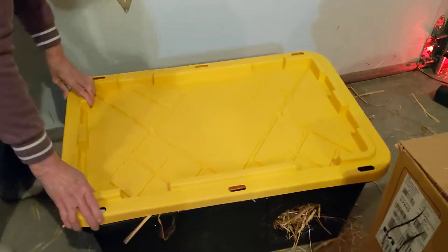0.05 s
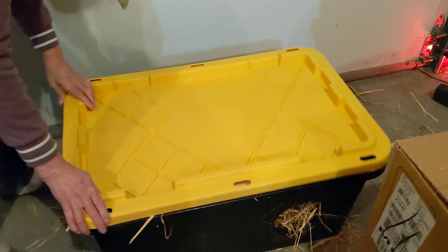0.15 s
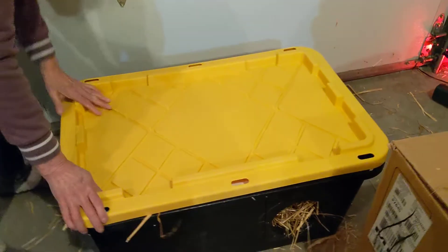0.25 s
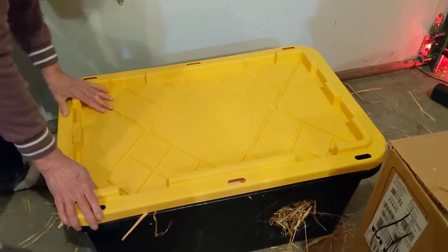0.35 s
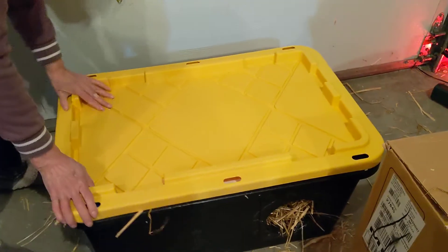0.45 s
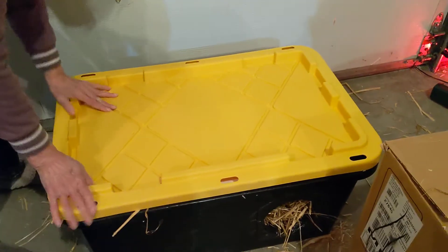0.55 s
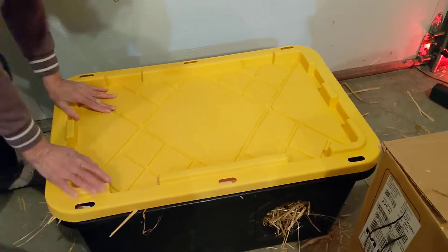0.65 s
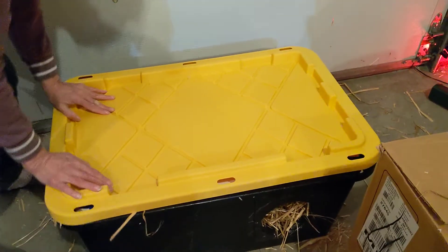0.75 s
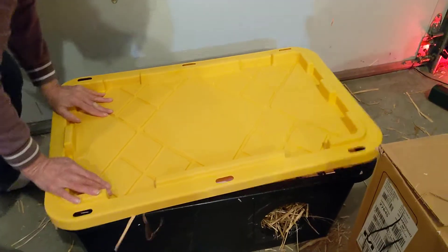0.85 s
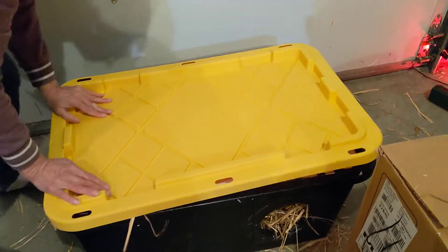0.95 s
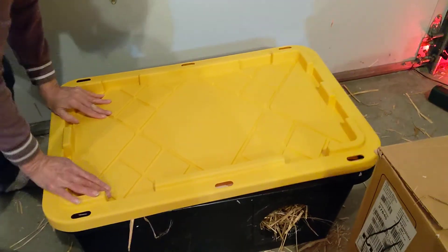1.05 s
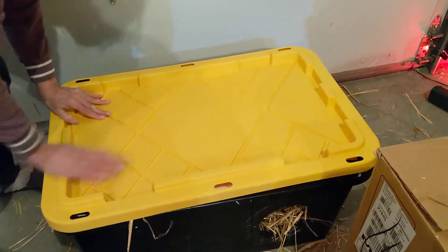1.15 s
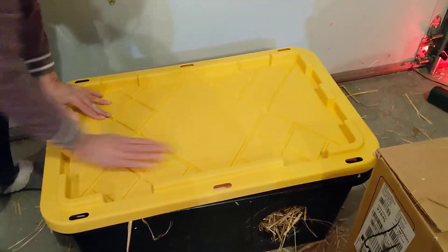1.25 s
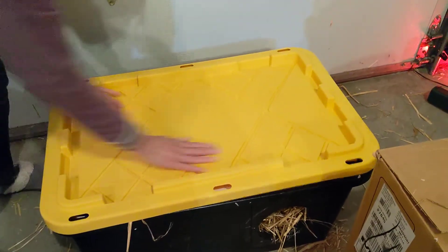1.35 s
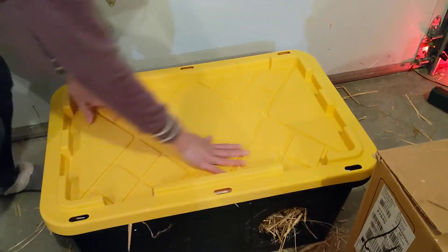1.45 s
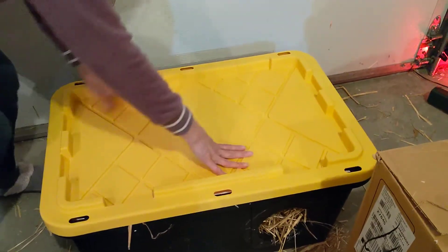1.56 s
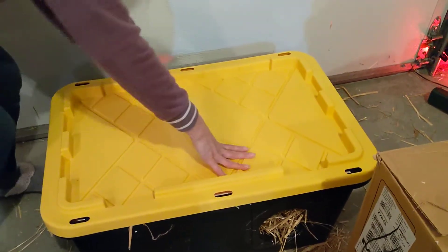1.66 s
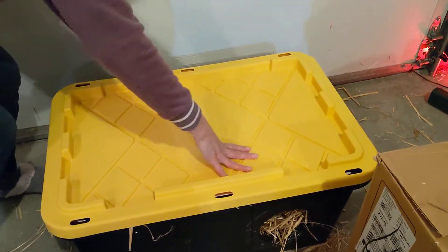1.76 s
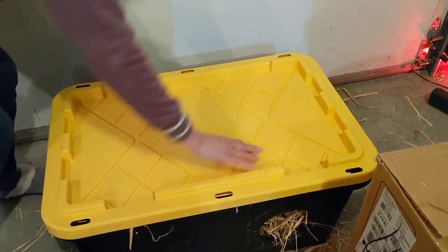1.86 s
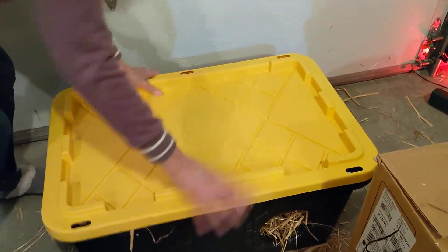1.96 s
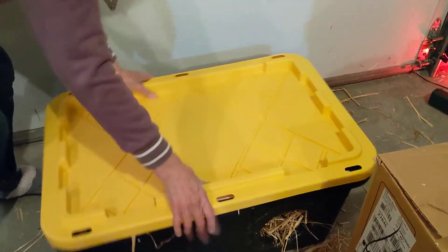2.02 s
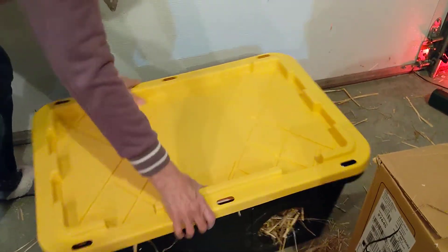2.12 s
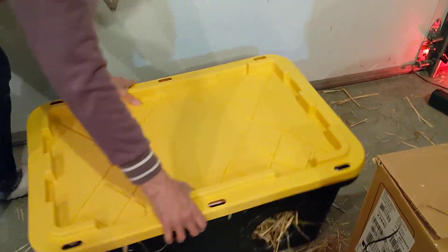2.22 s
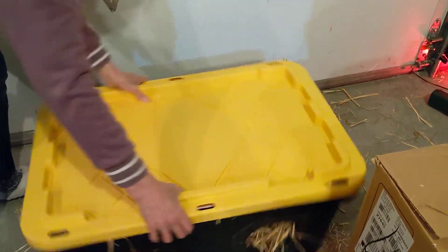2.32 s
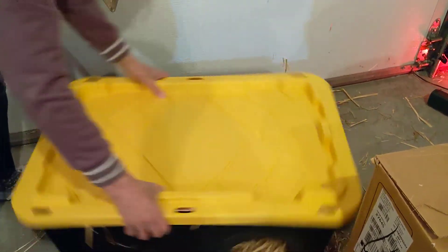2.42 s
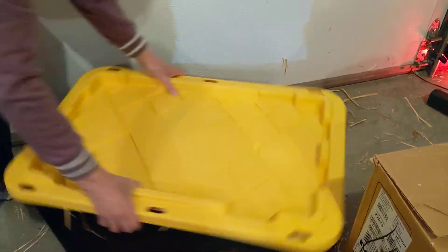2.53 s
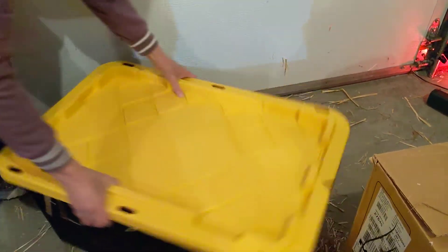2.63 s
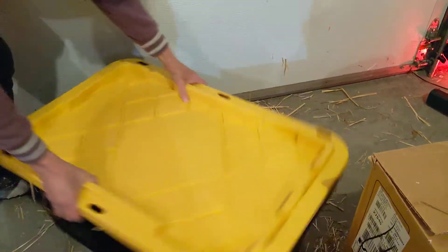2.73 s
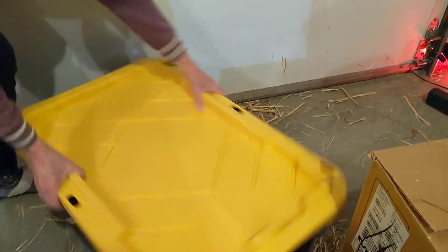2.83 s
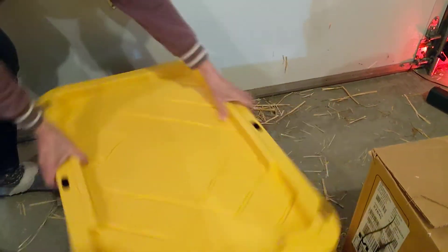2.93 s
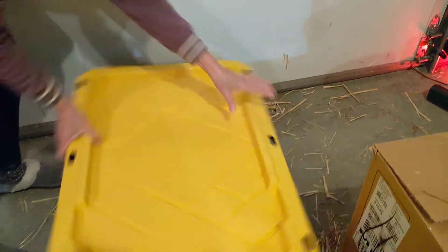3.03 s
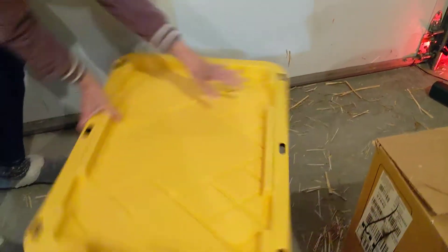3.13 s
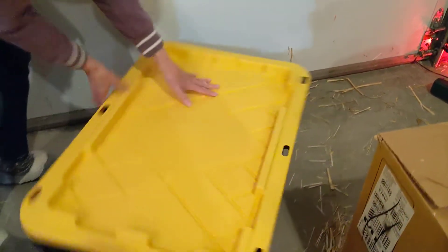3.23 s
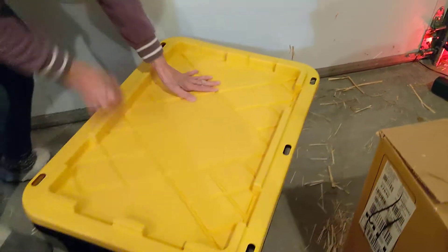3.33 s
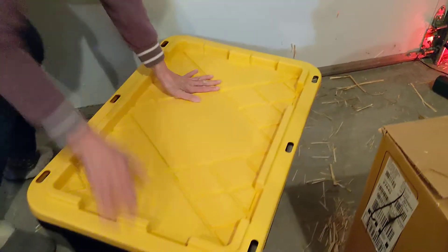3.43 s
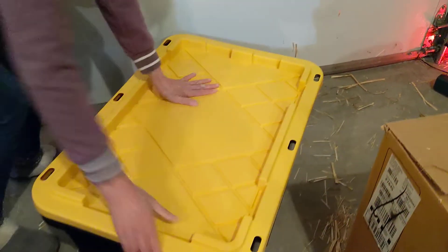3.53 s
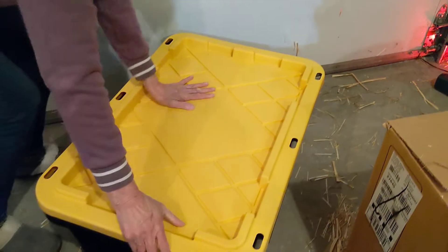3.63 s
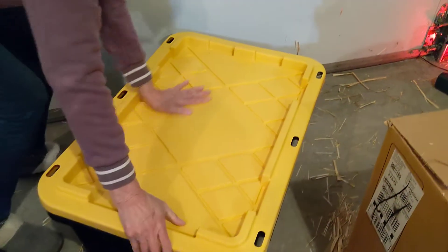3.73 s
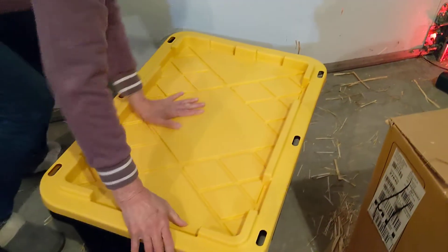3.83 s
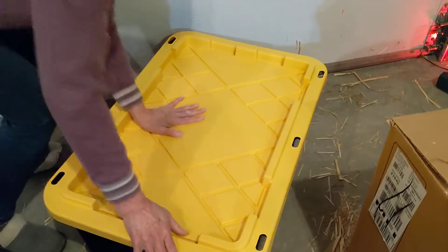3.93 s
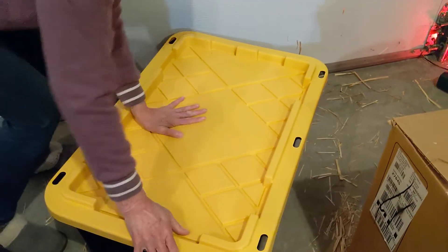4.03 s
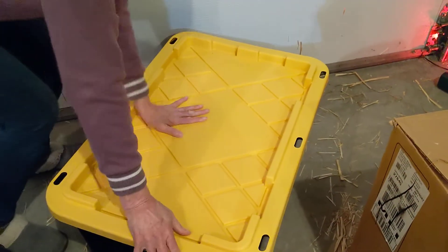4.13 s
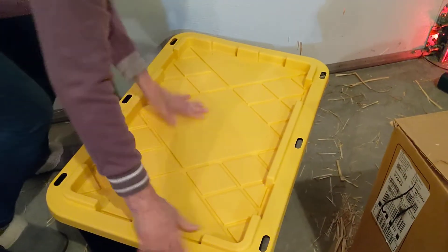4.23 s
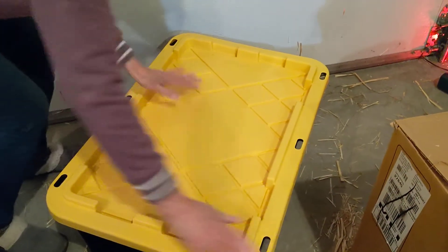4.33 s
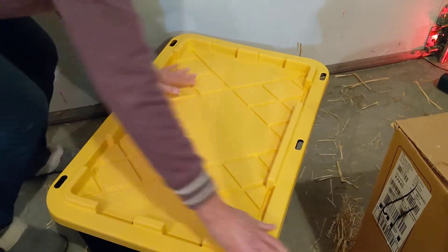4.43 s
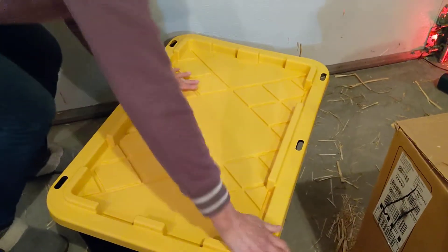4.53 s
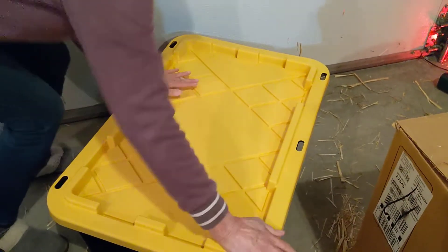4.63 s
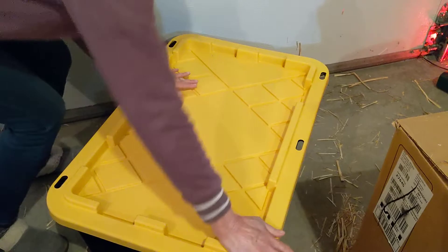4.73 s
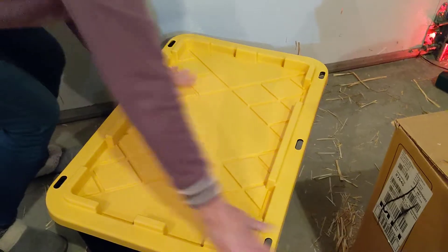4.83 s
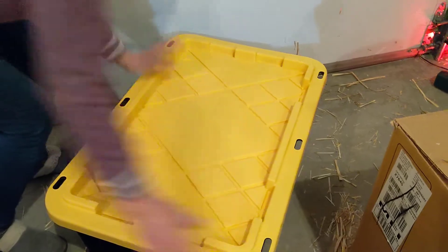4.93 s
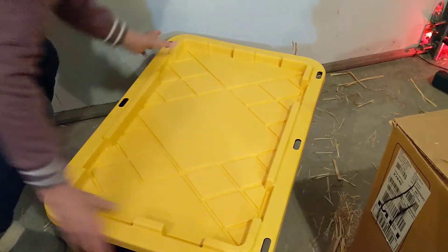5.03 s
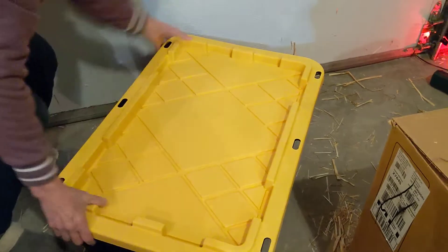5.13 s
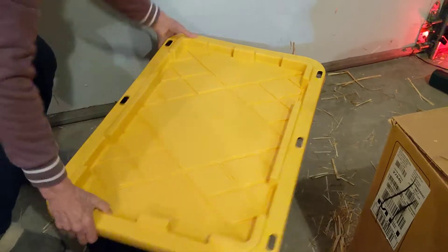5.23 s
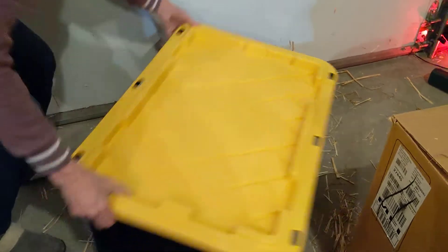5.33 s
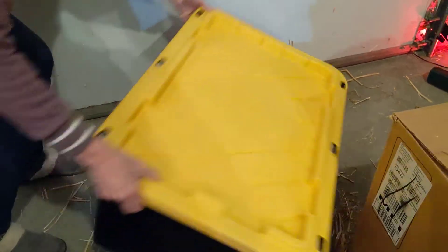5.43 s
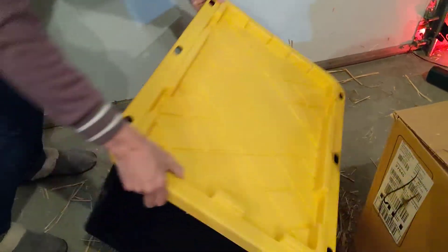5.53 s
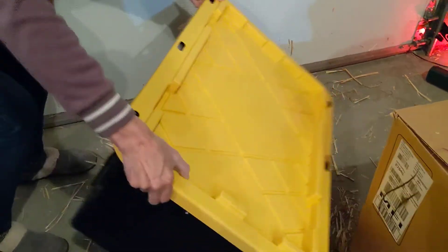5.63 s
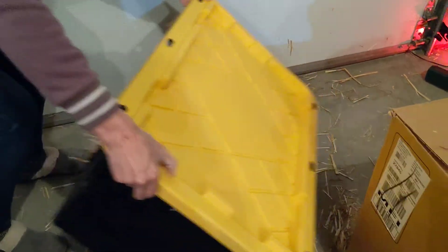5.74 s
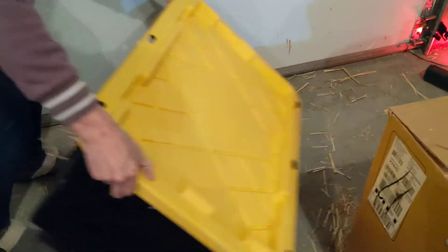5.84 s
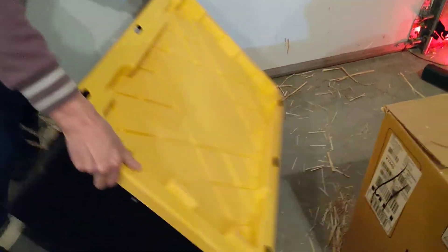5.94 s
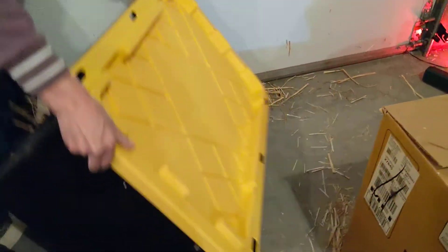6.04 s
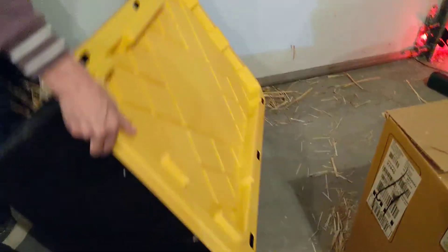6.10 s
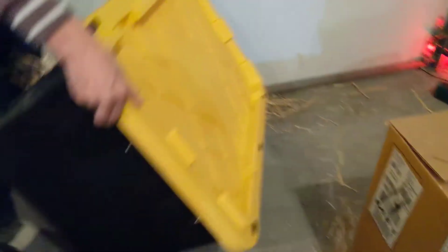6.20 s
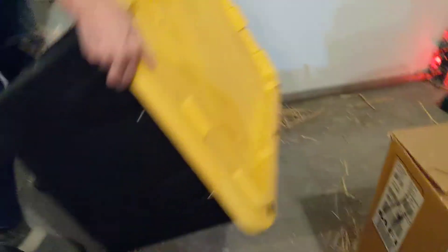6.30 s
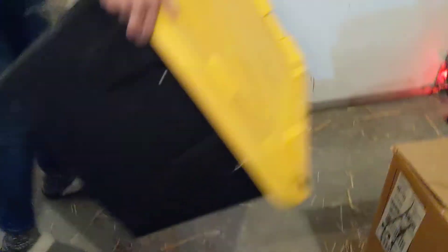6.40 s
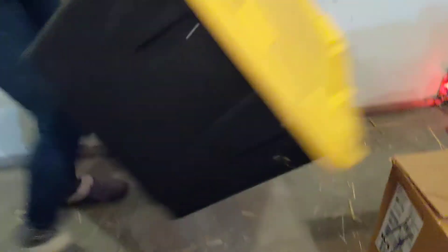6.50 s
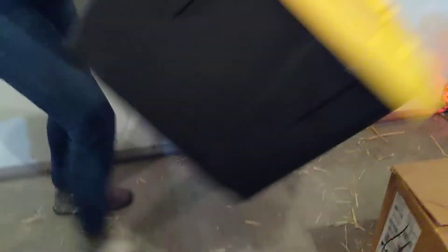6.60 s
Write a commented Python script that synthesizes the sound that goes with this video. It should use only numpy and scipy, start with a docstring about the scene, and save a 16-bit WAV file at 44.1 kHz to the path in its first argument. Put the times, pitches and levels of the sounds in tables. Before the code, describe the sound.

Sharp plastic snaps and hollow hand thumps on a storage bin, with gritty scraping as it is turned and dragged in a bare room.

```python
"""In a bare concrete room, a plastic lid is pressed onto a big storage tote: the rim clicks over the lip
and snaps home just before 1 s. Hands pat and brush the lid, and the hollow body booms. From 2 s the tote
is swung round on the gritty floor, its base scraping, chattering as it sticks and slips, a wall groaning
as the turn slows. Near 4 s the rim snaps home again, and a few softer pats and clicks follow.
From about 5.4 s the tote is dragged once more, then lifted away with a last faint scuff."""
import sys
import numpy as np
from scipy import signal
from scipy.fft import rfft, irfft, next_fast_len
from scipy.io import wavfile
from scipy.ndimage import map_coordinates

SR = 44100
rng = np.random.default_rng(int(sys.argv[2]) if len(sys.argv) > 2 else 0)


def store_pcm(level_fs):
    """Save levels as 16-bit WAV."""
    pcm = np.round(np.clip(level_fs, -1, 1) * 32767).astype(np.int16)
    wavfile.write(sys.argv[1], SR, np.atleast_2d(pcm).T)


N = 294014


def amp(db):
    """Decibels to gain."""
    return 10 ** (np.asarray(db) / 20)


def unit(x):
    """Scale to rms 1."""
    return x / np.sqrt(np.mean(x ** 2) + 1e-20)


def along(points, hz):
    """Read a curve of (f/Hz, value) points on a log frequency axis."""
    f, values = np.transpose(points)
    return np.interp(np.log(hz + 1), np.log(f + 1), values)


def filtered(x, response):
    """x times a complex response of frequency."""
    n = x.shape[-1]
    padded = next_fast_len(n + SR // 4)
    return irfft(rfft(x, padded) * response(np.fft.rfftfreq(padded, 1 / SR)), padded)[..., :n]


def eq(x, points, size=4096):
    """Minimum-phase EQ through (f/Hz, level/dB) points."""
    cepstrum = irfft(np.log(amp(along(points, np.fft.rfftfreq(size, 1 / SR)))))
    cepstrum[1:size // 2] *= 2
    cepstrum[size // 2 + 1:] = 0
    impulse = irfft(np.exp(rfft(cepstrum)))
    return signal.fftconvolve(x, impulse[None], axes=1)[:, :x.shape[1]]


def resonant(x, modes):
    """A bank of (f/Hz, width/Hz, level/dB) resonators of alternating polarity."""
    return filtered(x, lambda f: sum(
        (-1) ** k * amp(db) * 1j * f * width / (hz * hz - f * f + 1j * f * width)
        for k, (hz, width, db) in enumerate(modes)))


# stereo image: f/Hz, left-right correlation
STEREO_LIKENESS = [(25, 1), (70, 0.98), (150, 1), (300, 0.84), (700, 0.78), (1500, 0.47), (3000, 0),
                   (5000, 0), (15000, 0.029)]
def spread(pair):
    """Two unrelated signals become left and right: narrow in the bass, wide in the treble."""
    def weights(hz):
        angle = np.arccos(np.clip(along(STEREO_LIKENESS, hz), -1, 1)) / 2
        return np.array([np.cos(angle), np.sin(angle)])
    mid, side = filtered(pair, weights)
    return np.array([mid + side, mid - side])


def noise(size):
    """White stereo noise."""
    return spread(rng.standard_normal((2, size)))


def wobble(rate):
    """A smooth random curve, rate knots a second."""
    knots = rng.standard_normal(int(N * rate / SR) + 4)
    return map_coordinates(knots, [np.arange(N) * rate / SR])


def grains(rate, scatter_db):
    """Tiny stereo impacts of uneven size at random moments, about rate a second."""
    struck = rng.random(N) < rate / SR
    sizes = amp(scatter_db * np.clip(rng.standard_normal(N), -2, 2))
    return spread(struck * sizes * rng.standard_normal((2, N)))


def stroke(start, rise, hold, release, bend=1.25):
    """Speed envelope of one movement, 0 to 1, with slightly curved ramps."""
    t = np.arange(N) / SR - start
    return np.clip(np.minimum(t / rise, 1 - (t - rise - hold) / release), 0, 1) ** bend


def add(track, start_s, sound):
    """Mix a sound in at start_s."""
    start = max(round(start_s * SR), 0)
    track[:, start:start + sound.shape[1]] += sound[:, :N - start]


# tone of the room's air: f/Hz, level/dB
AIR_EQ = [(12, -28.5), (20, -5.5), (70, -5), (270, -22), (485, -21), (660, -23), (1220, -25), (1960, -27),
          (5680, -27), (6540, -28.5), (7520, -28), (12400, -31), (16000, -42.5)]
def room_tone(level_db=-59.5):
    """The bed: a faint, steady, bass-heavy rush of air."""
    return amp(level_db) * unit(eq(noise(N), AIR_EQ))


# decay of the concrete room, ahead of the tail's fade-out: f/Hz, t60/s
ROOM_DECAY = [(60, 0.27), (200, 0.79), (700, 0.72), (2500, 0.81), (5500, 0.77), (8000, 0.63), (11000, 0.47),
              (15000, 0.39)]
def room(x, wet_db, early_db, early_t60=0.25, build_s=0.047, fade_s=.45):
    """Floor and near wall answer at once; the bare room's tail builds up and dies slowly."""
    hz, t, bands = signal.stft(noise(SR - SR // 4), SR, nperseg=256)
    tail = signal.istft(bands * amp(-60 * t / along(ROOM_DECAY, hz)[:, None]), SR, nperseg=256)[1]
    t = np.arange(tail.shape[1]) / SR
    tail = tail * (1 - np.exp(-t / build_s)) * np.exp(-(t / fade_s) ** 4)
    early = noise(len(t)) * (t > .003) * amp(-60 * t / early_t60)
    echoes = amp(wet_db) * tail / np.linalg.norm(tail[0])
    echoes += amp(early_db) * early / np.linalg.norm(early[0])
    echoes = eq(echoes, [(6000, -3.5), (12000, -1), (13500, -3)])
    return signal.fftconvolve(x, echoes, axes=1)[:, :x.shape[1]]


def moving_room(x, wet_db, early_db, count=4):
    """The echoes of a moving tote keep changing: the send cycles through a few reverbs once a second."""
    t = np.arange(N) / SR
    sends = [np.maximum(np.cos(2 * np.pi * (t - k / count)), 0) for k in range(count)]
    return sum(room(x * send, wet_db, early_db) for send in sends)


# rumble of the big panels: f/Hz, level/dB
PANEL_EQ = [(15, -12), (30, -9.5), (52, -4.5), (75, -4.5), (130, -17.5), (250, -17.5), (600, -34),
            (2000, -90)]
def heave(blow_db=-19, sway_db=-43.0, attack_s=0.01, t60=.7, per_boom=0.29, per_scrape=0.33):
    """The low end: the big panels heave after every blow and sway while the tote slides."""
    t = np.arange(SR) / SR
    settle = (1 - np.exp(-t / attack_s)) * amp(-60 * t / t60)
    sway = sum(amp(sway_db + per_scrape * db) * stroke(start, rise, hold, release)
               for start, rise, hold, release, db, *_ in SLIDES)
    power = sway[None] ** 2
    for start, db, boom_db, _ in BLOWS:
        swell = amp(db + blow_db + per_boom * boom_db) * settle
        add(power, start, swell[None] ** 2)
    return np.sqrt(power) * unit(eq(noise(N), PANEL_EQ))


# hiss of a palm on plastic: f/Hz, level/dB
PALM_EQ = [(180, -63), (300, -35), (678, -13), (1460, -12.5), (1660, -8.5), (4520, -7.5), (5800, -5),
           (14700, -10), (16000, -15)]
# a brief tick of hiss at the very start, then palms and sleeves sweeping the lid:
# peak t/s, rise/s, fall/s, level/dB
HISS_SWELLS = [(0.005, 0.012, 0.0067, -37.5), (0.69, 0.14, .093, -45.5), (1.205, .035, 0.018, -47),
               (1.464, 0.058, 0.064, -35.5), (1.9, 0.06, 0.077, -45), (3.539, .026, 0.092, -43.5),
               (3.631, 0.019, 0.16, -44), (3.85, 0.062, 0.06, -37.5), (4.61, .012, 0.056, -45.5),
               (4.878, 0.029, 0.025, -47), (5.235, 0.048, 0.1, -47), (5.4, 0.011, 0.016, -46.5)]
def hands():
    """After an opening tick of hiss, skin and cloth brush the textured lid, loudest where fastest."""
    t = np.arange(N) / SR
    envelope = sum(amp(db) * np.exp(-.5 * ((t - peak) / np.where(t < peak, rise, fall)) ** 2)
                   for peak, rise, fall, db in HISS_SWELLS)
    return envelope * unit(eq(noise(N), PALM_EQ))


# a wall groaning as the turn slows: t/s, rise/s, hold/s, release/s, level/dB, f/Hz
WALL_GROANS = [(3.039, .04, 0.016, .05, -32.5, 620), (3.17, .03, .02, .05, -36.5, 644)]
def groans(width_hz=45):
    """The juddering base briefly drives one resonance of a wall."""
    return sum(amp(db) * stroke(*timing) * unit(resonant(noise(N), [(hz, width_hz, 0)]))
               for *timing, db, hz in WALL_GROANS)


# resonances of the tote's walls: f/Hz, width/Hz, level/dB
WALL_MODES = [(149, 80, -8.5), (293, 160, -6.5), (389.5, 150, -5.5), (576, 120, -3), (677.4, 46, -1),
              (850, 120, -6.5), (1053, 87, -7.5), (1690, 300, -7)]
# body of the coarse scrape: f/Hz, level/dB
SCRAPE_EQ = [(150, -31.5), (500, -8.5), (850, -1), (1250, -2.5), (2500, 2), (5000, -0.5), (7000, -5.5),
             (10000, -12), (16000, -29)]
# sizzle of the fine grit: f/Hz, level/dB
GRIT_EQ = [(1500, -35), (4500, -16), (6000, 3.5), (9000, 4), (12000, 7), (16000, -2)]
# shoves over the floor: t/s, rise/s, hold/s, release/s, level/dB, drone trim/dB, grit trim/dB,
# wall pitch ratio (the walls are stiffer when the tote stands on one edge)
SLIDES = [(0.0, 0.0033, 0.25, 0.028, -55, 11, 0.5, 0.9),
          (0.305, 0.023, .015, 0.041, -43.5, -20.5, -8, 0.46),
          (0.462, 0.076, 0.012, 0.072, -57.5, 9.5, 1, 0.9),
          (2.002, 0.11, 0.075, 0.17, -38.5, 2.5, 0.5, 0.97), (2.302, 0.043, .03, .09, -41, 0.5, 0, 1),
          (2.331, 0.17, 0.27, .04, -32.5, -4, 3, 1.074), (2.66, 0.4, 0.017, 0.39, -31, -4.5, 2.5, 1),
          (5.36, .03, 0.087, .06, -52, 1.5, -3.5, 1.35), (5.44, 0.082, 0.2, 0.09, -38.5, -4, -5.5, 1.35),
          (5.974, 0.091, .02, 0.17, -63, -3, -4, 1.6)]
def drags(scrape_db=6, drone_growth=.5, judder_db=0.77):
    """Grit crunches under the sliding base and sets the hollow walls droning; both swell with speed."""
    bumps = eq(grains(4000, scatter_db=2.5), [(1200, -1), (5000, -10.5)])
    coarse = amp(scrape_db) * unit(eq(grains(6000, scatter_db=1.5), SCRAPE_EQ))
    fine = unit(eq(grains(18000, scatter_db=2), GRIT_EQ))
    out = np.zeros((2, N))
    for *timing, db, drone_db, grit_db, pitch_ratio in SLIDES:
        speed = stroke(*timing)
        moving = speed > 0
        modes = [(hz * pitch_ratio, width, level) for hz, width, level in WALL_MODES]
        drone = unit(resonant(bumps[:, moving], modes))
        out[:, moving] += amp(db + drone_db) * speed[moving] ** drone_growth * drone
        out += amp(db) * speed * (coarse + amp(grit_db) * fine)
    return out * amp(judder_db * wobble(45))


# resonances of the stiff base, ahead of the varispeed: f/Hz, width/Hz, level/dB
BASE_MODES = [(1442, 420, -1), (1727, 420, 0), (2150, 300, -3.5), (2406, 156, 2.5), (2630, 388, 0.5),
              (3110, 960, -11), (5700, 980, -30.5)]
# stick-slip bursts at the height of the turn: t/s, rise/s, hold/s, release/s, level/dB
SLIP_BURSTS = [(2.29, .42, .05, .045, -16.5), (2.86, .018, .005, .075, -21.5), (2.9, .03, .05, .12, -30)]
def chatter(slip_rate=260, unevenness=.45, decay_cycles=0.59, top_varispeed=1.0389, glide=.08):
    """The base sticks and slips unevenly; each slip rings the plastic, higher as the swing speeds up."""
    speed = sum(amp(db) * stroke(*timing) for *timing, db in SLIP_BURSTS)
    cycle = np.cumsum(slip_rate * np.exp(unevenness * wobble(200))) / SR % 1
    slips = noise(N) * np.exp(-cycle / decay_cycles) * amp(1.8 * wobble(110))
    slips = eq(slips, [(500, -19.0), (1300, -21.0), (6000, 3.0), (12000, -2.0)])
    rasp = resonant(slips, BASE_MODES)
    varispeed = top_varispeed * np.maximum(speed / speed.max(), .1) ** glide
    playhead = np.cumsum(varispeed)
    rasp = np.array([map_coordinates(side, [playhead], mode="mirror") for side in rasp])
    return speed * unit(rasp)


# low modes of the hollow tote: f/Hz, level/dB, t60/s
BODY_MODES = [(44, -18.5, .2), (56.3, -7.5, 0.21), (84, 3, 0.055), (112, 2, 0.066), (124.5, 0.5, 0.12),
              (162.2, -8.5, 0.34), (179.8, -5, 0.22), (231.5, -2, 0.092), (265, -3, 0.091),
              (350.3, -8.5, 0.19)]
# blows, sharp from the lid and soft from a palm: t/s, level/dB, boom weight/dB, attack/s
BLOWS = [(0.003, -28, 3, 0.0069), (0.237, -19.5, -7, 0.0036), (0.689, -34, 20, 0.016),
         (0.834, -26, -26, 0.0014), (0.865, -21, 3, 0.0015), (1.388, -31, 3, 0.0043),
         (1.409, -26.5, 10, 0.0045), (1.434, -22.5, -3, 0.0059), (1.458, -20.5, -5, 0.0039),
         (1.585, -29.5, -4, 0.0086), (1.734, -32.5, -25, 0.0039), (1.812, -22, -1, 0.022),
         (3.592, -32, 6, 0.0093), (3.649, -34, -25, 0.0034), (3.932, -32, 9, .004),
         (3.973, -13, -0.5, 0.0012), (4.284, -36, -0.5, 0.00205), (4.506, -32, -11, .014),
         (4.591, -33, 21, 0.0064), (4.646, -29.5, 3, .005), (4.7, -41, 17, .005), (5.152, -31, -3, 0.0051),
         (5.301, -30.5, -6, .02), (5.707, -32.5, 1, 0.0062)]
def thumps(level_db=-9, slap_db=-3, detune_spread=0.032):
    """Each blow is a slap that rings the tote's low modes; a push mid-lid pumps the deepest ones."""
    out, t = np.zeros((2, N)), np.arange(SR // 3) / SR
    hz, mode_db, t60 = np.transpose(BODY_MODES)[:, :, None]
    boom_share = along([(60, 0.42), (170, 0.015)], hz)
    for start, db, boom_db, attack in BLOWS:
        strength, detune, phase = rng.standard_normal((3, len(BODY_MODES), 1))
        decays = amp(mode_db + boom_share * boom_db + 2 * strength - 60 * t / t60)
        modes = decays * np.sin(2 * np.pi * (hz * (1 + detune_spread * detune) * t + phase))
        slap = unit(eq(noise(len(t)), [(300, -6.5), (700, -5.5), (4000, -40.5)]))
        slap *= amp(slap_db - 60 * t / .09)  # gone in 90 ms
        add(out, start, amp(db + level_db) * (modes.sum(0) + slap) * (1 - np.exp(-t / attack)))
    return out


# tone of the plastic crack: f/Hz, level/dB
CRACK_EQ = [(100, -19), (350, -4), (550, 1), (1500, 0), (4000, 1.5), (7000, -1), (11500, -5), (16000, -17)]
# the rim catching on the lip: t/s, level/dB, t60/s, brightness/dB, rim f/Hz, ring trim/dB
RIM_CATCHES = [(0.164, -19, 0.0048, 2, 2560, 11), (0.223, -21, 0.045, -9.5, 2430, -4),
               (0.236, -8, 0.033, -13.5, 1574, -11.5), (0.79, -28.5, 0.087, -7, 2630, -10.5),
               (0.833, -20, .033, -7, 1460, -15), (0.864, -15.5, 0.038, -12, 794, -10),
               (0.879, 0.5, .03, -4, 3600, -18), (0.886, -12, .067, -12, 1217, 0),
               (0.897, -7, .079, -11.5, 2900, -13.5), (1.504, -16.5, .034, -27.5, 1445, -3),
               (3.957, -23, .15, -21, 1740, -16), (3.967, -3, 0.066, -7, 1560, -8.5),
               (3.985, -4.5, 0.085, -6, 2310, -5), (4.001, -16.5, .09, -6, 2020, 2.5),
               (4.282, -32.5, 0.041, -15, 833, -7), (4.591, -33.5, 0.053, -10, 2370, -13),
               (4.639, -34.5, 0.099, -19.5, 1096, -7), (4.677, -28.5, .04, -33, 980, -15),
               (5.136, -37, .05, -25, 1550, -12), (5.154, -29.5, 0.024, -5.5, 2620, -24)]
def snaps(level_db=-4, ring_stretch=1.1, rim_width_hz=450, rim_split=.12, neutral_db=-8, attack_s=0.0012):
    """The rim jumps the lip: a crack scatters through the lid and the flexed edge rings briefly."""
    out, t = np.zeros((2, N)), np.arange(SR // 4) / SR
    rise = 1 - np.exp(-t / attack_s)
    for start, db, t60, bright_db, rim_hz, ring_db in RIM_CATCHES:
        crack = unit(eq(noise(len(t)), CRACK_EQ)) * rise * amp(-60 * t / t60)
        crack = eq(crack, [(2500, 0.011), (11000, bright_db - neutral_db)])
        # top and skirt of the rim ring a little apart
        modes = [(rim_hz * (1 + side * rim_split), rim_width_hz, 0) for side in (-1, 1)]
        ring = unit(resonant(noise(len(t)), modes)) * rise * amp(ring_db - 60 * t / (ring_stretch * t60))
        snap = np.pad(amp(db + level_db) * (crack + ring), [(0, 0), (0, SR // 2)])
        add(out, start, snap + room(snap, wet_db=-4, early_db=1.0))  # each spot has its own echoes
    return out


def scene():
    """The mix: snaps and thumps up front, friction and rumble a touch left, reverb and room tone behind."""
    handling = thumps() + (drags() + chatter() + groans() + hands() + heave()) * amp([[.4], [-.4]])
    air = room_tone()
    return snaps() + handling + moving_room(handling, wet_db=-12.0, early_db=-3.5) + air


# treble ripple of the microphone ports: f/Hz, level/dB
PORT_EQ = [(3600, 1), (4700, -1.5), (5750, 5), (6500, -3.5), (7400, 3.5), (8500, -3.5), (9600, 3),
           (10600, -1.5), (11700, 2), (12900, -1), (14200, 3)]
def record(dry, top_hz=16100):
    """The master chain: rippled treble, a hard clip at full scale, then a brick-wall low-pass."""
    clipped = np.clip(eq(dry, PORT_EQ), -1, 1)
    return filtered(clipped, lambda hz: hz < top_hz)


dry = scene()
out = record(dry)
store_pcm(out)
```